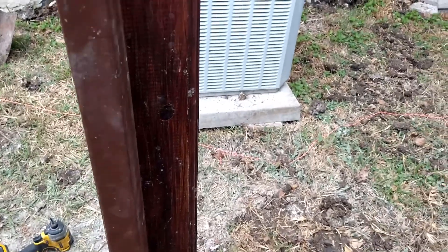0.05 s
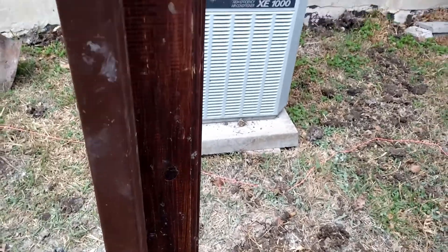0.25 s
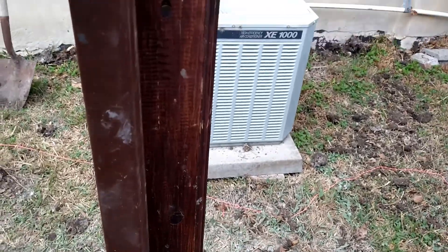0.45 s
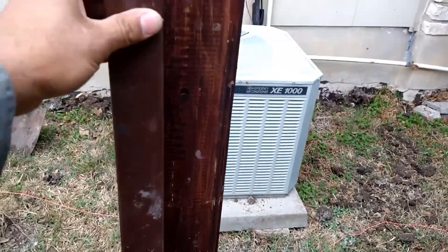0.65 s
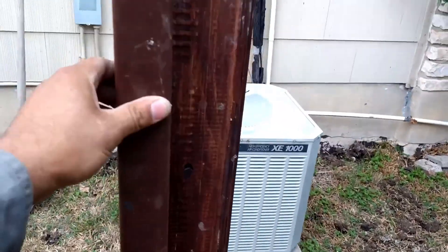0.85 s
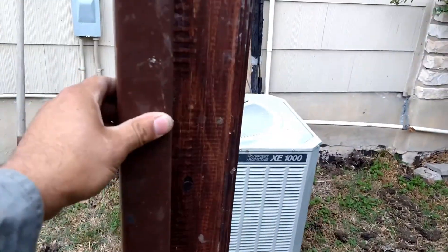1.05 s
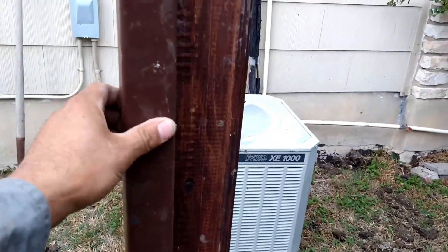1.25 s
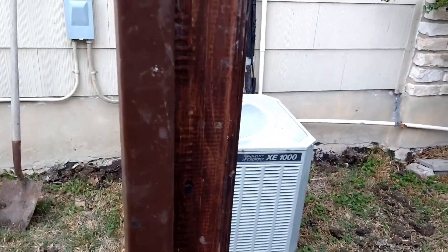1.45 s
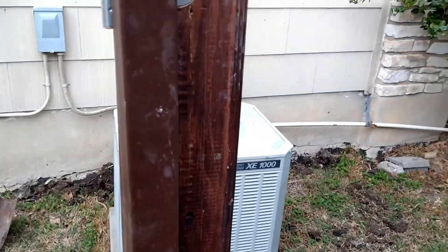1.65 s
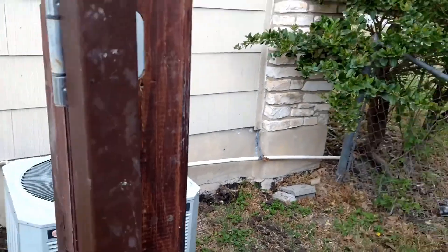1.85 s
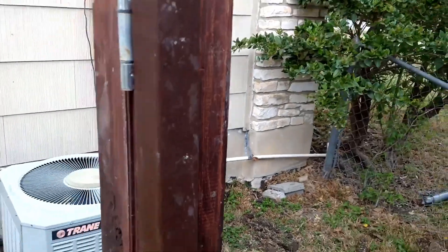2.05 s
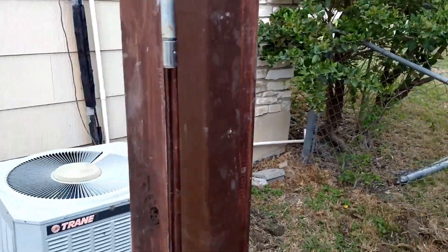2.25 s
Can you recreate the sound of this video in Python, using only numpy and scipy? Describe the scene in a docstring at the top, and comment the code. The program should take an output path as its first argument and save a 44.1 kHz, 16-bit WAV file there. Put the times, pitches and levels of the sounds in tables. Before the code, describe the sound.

Sharp rattle of a steel latch on a wooden yard gate, followed by small clinks.

```python
"""Rattling latch on a yard gate

A steel latch rattles close by, the wooden gate thuds and a loose metal piece clinks: each impact is
a noise burst plus decaying modes, reflected by the house wall and yard. Behind lie a low rumble, airy
hiss, a faint machine hum and whine, and late scuffs; wind buffets mainly the left microphone port."""
import sys
import numpy as np
from scipy import signal
from scipy.fft import rfft, irfft, next_fast_len
from scipy.io import wavfile
from scipy.ndimage import map_coordinates

SR = 44100
rng = np.random.default_rng(int(sys.argv[2]) if len(sys.argv) > 2 else 0)


def unload_wav(signal):
    """Save mono or channel-first audio to the path in sys.argv[1] as 16-bit WAV at rate SR, clipped to [-1, 1]."""
    wavfile.write(
        sys.argv[1],
        SR,
        np.round(np.clip(np.atleast_2d(signal).T, -1, 1) * 32767).astype(np.int16),
    )


N = 101429

# Noise spectra, shape only: frequency_hz, density_db
RUMBLE_SPECTRUM = [(15, -41), (25, -15.5), (91, -5.5), (173, -6.5), (253, 0), (331, -6.5), (359, -2),
                   (433, -10), (567, -9), (762, -11.5), (1350, -13.5), (2170, -16), (4500, -13),
                   (8130, -19.5), (15500, -41)]
HISS_SPECTRUM = [(2000, -27), (5000, 5), (8300, 8), (11000, -5), (15000, -3.5)]
WIND_SPECTRUM = [(25, -21), (60, -1), (115, 4), (180, -7.5), (350, -28), (8000, -77.5)]
CRACK_SPECTRUM = [(530, -57), (1980, -14), (2700, -17), (3600, -12.5), (5120, -6), (5770, -5), (7590, -4.5),
                  (9070, -5.5), (9980, -12), (11500, -11.5), (15500, -14.5)]
WOOD_SPECTRUM = [(30, -34.5), (130, -3), (230, 1), (520, -9.5), (1400, -15.5), (2600, -25.5), (5000, -71)]
SQUEAK_SPECTRUM = [(10300, -45), (11100, -3), (11450, 2), (12300, -41)]
SCUFF_SPECTRUM = [(100, -8.5), (350, -3), (800, -4), (1800, -14), (2750, -7.5), (3600, -22), (9000, -34.5)]
# Likeness of left and right: frequency_hz, coherence
AIR_COHERENCE = [(60, 0.92), (130, 0.88), (290, 1), (640, 0.404), (1400, 0.033), (8000, 0.036)]
METAL_COHERENCE = [(1000, 0.3), (2200, -0.56), (4400, 0.15), (8000, 0.0035), (13000, 0.38)]
# Stereo balance: frequency_hz, left_minus_right_db
AIR_BALANCE = [(100, -0.5), (600, 0.5), (1400, -3.5), (4400, -3), (15000, -5)]
METAL_BALANCE = [(1000, 1), (2400, -2.5), (4400, 1), (8000, -3.5), (15000, -5)]
# Slow changes of the background: time_s, gain_db
RUMBLE_GAIN = [(.8, -52), (2.3, -54)]
HISS_GAIN = [(0, -58.5), (.55, -56), (.9, -66.5), (2.3, -72.5)]
HUM_GAIN = [(1.7, -2), (2, -9.5)]  # the low hum eases as the microphone turns
WHINE_GAIN = [(0, 2), (.36, 12), (.5, 2.5), (1.0, 1.5), (1.7, 2), (1.95, -3.5), (2.3, -2)]
# Spectral lines of the machine: centre_hz, level_db, width_hz
MACHINE_LINES = [(221, -64, 36), (358, -71, 33), (1399, -69, 160), (2754, -68.5, 67), (4124, -68, 120)]
# Swells of noise: centre_s, half_width_s, level_db
WIND_PUFFS = [(.008, 0.036, -50.5), (1.018, 0.024, -42), (1.16, 0.12, -60.5), (2.002, 0.018, -36),
              (2.044, 0.012, -28.5), (2.088, 0.017, -46), (2.19, 0.029, -31), (2.243, 0.015, -30),
              (2.295, 0.036, -38.5)]
BAR_SQUEAKS = [(.2535, 0.0018, -12.5)]
SCUFFS = [(1.86, 0.045, -54.5), (2.07, 0.11, -55), (2.27, 0.1, -50.5)]
# Impacts of the loose piece: start_s, level_db, focus_hz, ring_gain_db, crack_t60_s
PIECE_IMPACTS = [(0.0285, -34.5, 8850, -31, 0.01), (.5724, -27.5, 8200, -4, 0.057),
                 (0.5734, -40.5, 5070, 18, .015), (.5845, -46, 6500, -4, .06),
                 (0.6111, -31, 9400, 7, 0.043), (0.614, -30, 9400, 4.5, 0.072),
                 (0.628, -35.5, 5600, -0.5, .08), (0.652, -41, 8900, -6, 0.093),
                 (0.701, -49, 5200, 5.5, 0.017), (.712, -41.5, 9600, -6, 0.073)]
# Contacts and rebounds of the latch: start_s, level_db, focus_hz
LATCH_IMPACTS = [(0.243, -26, 4520), (.2462, -14.5, 8700), (.2478, -17, 3670), (0.251, -12.5, 7000),
                 (0.2535, -18, 3630), (.2613, -13.5, 7700), (.2635, -19.5, 8700), (.2675, -23, 5170),
                 (.2725, -17.5, 7000), (.2777, -14, 7800), (0.2781, -27.5, 12500), (.2823, -20, 7300),
                 (.2862, -15, 8260), (.2918, -18.5, 6500), (.2957, -20, 7800), (.2995, -30, 7000),
                 (.3062, -17.5, 9150), (0.3106, -18, 5870), (.317, -21, 7360), (.3215, -26, 12000),
                 (.328, -26, 12500), (.353, -49, 6570), (0.4145, -33, 7200), (.441, -38, 6700),
                 (0.4492, -28.5, 6960), (0.471, -34.5, 7000)]
# Knocks of the gate: start_s, level_db, puff_t60_s, focus_hz
GATE_IMPACTS = [(0.246, -40, 0.13, 131), (.2925, -30.5, 0.074, 223), (.309, -30.5, 0.06, 660),
                (.324, -31.5, 0.038, 240), (.338, -36, 0.13, 300)]
# Normal modes of the struck bodies: pitch_hz, level_db, t60_s
PIECE_MODES = [(5120, -4.5, 0.039), (5250, 0, 0.037), (6120, -12, .04), (7400, -3, .025),
               (8916, -2.5, 0.084), (9500, -8.5, 0.024), (11240, -8.5, 0.15)]
LATCH_MODES = [(3660, -5.5, 0.0694), (5260, -0.5, 0.086), (6320, -4.5, 0.15), (6650, -1, 0.17),
               (6820, -7.5, .09), (7120, -3, .09), (7170, -8, .16), (7770, -0.5, .08), (7915, 0, 0.07),
               (8400, -2.5, 0.068), (8866, 3, 0.079), (11290, 4, .16), (12545, -1, 0.14)]
BOARD_MODES = [(140.7, -3, 0.24), (178.3, -5.5, .09), (239.1, -2, 0.22), (355.7, -5, .16),
               (516, -6.5, 0.09), (676, -3, 0.043), (983, -3.5, 0.0619)]
# Reverberation time of the yard: frequency_hz, t60_s
YARD_DECAY = [(200, 0.16), (3000, 0.16), (8000, 0.33), (15000, 0.18)]

METAL_ATTACK_S, PIECE_ATTACK_S, WOOD_ATTACK_S = 0.00018, 0.0011, 0.00086
STRESS_OCTAVES, STRESS_DB = 0.35, 4.5  # width and depth of the band a metal contact favours


def amp(db):
    """Amplitude ratio of a level in decibels."""
    return 10 ** (np.asarray(db) / 20)


def unit(x):
    """Normalisation to rms 1."""
    return x / np.sqrt(np.mean(x ** 2) + 1e-20)


def along(points, hz):
    """Interpolation on a logarithmic frequency axis."""
    knots_hz, values = np.transpose(points)
    return np.interp(np.log(hz + 1), np.log(knots_hz + 1), values)


def curve(rows):
    """Linear interpolation in time, one value per sample."""
    return np.interp(np.arange(N) / SR, *np.transpose(rows))


def filtered(x, response):
    """Linear filtering: the spectrum times a frequency response."""
    size = next_fast_len(x.shape[-1] + 8192)
    return irfft(rfft(x, size) * response(np.fft.rfftfreq(size, 1 / SR)), size)[..., :x.shape[-1]]


def noise(spectrum, coherence, size):
    """Partially coherent stereo noise of rms 1, mixed from independent mid and side signals."""
    def response(hz):
        angle = np.arccos(np.clip(along(coherence, hz), -1, 1)) / 2
        return amp(along(spectrum, hz)) * [np.cos(angle), np.sin(angle)]
    mid, side = filtered(rng.standard_normal((2, size)), response)
    return unit(np.array([mid + side, mid - side]))


def panned(x, balance):
    """Frequency-dependent level difference between the channels."""
    return filtered(x, lambda hz: amp(along(balance, hz) * np.array([[.5], [-.5]])))


def fade(t, t60):
    """Exponential decay, 60 dB in t60 seconds."""
    return np.exp(-np.log(1000) * t / t60)


def rise(t, attack_s):
    """First-order build-up towards 1."""
    return 1 - np.exp(-t / attack_s)


def add(track, start_s, sound):
    """Superposition of a sound on a track."""
    part = track[:, max(0, round(start_s * SR)):][:, :sound.shape[1]]
    part += sound[:, :part.shape[1]]


def burst(carrier, envelope):
    """Amplitude modulation, scaled so that the envelope alone sets the energy."""
    return unit(carrier * envelope) * np.sqrt(np.mean(envelope ** 2))


def swells(rows, spectrum, coherence):
    """Noise under Gaussian envelopes."""
    t = np.arange(N) / SR
    return sum(amp(db) * burst(noise(spectrum, coherence, N), np.exp(-((t - centre_s) / width_s) ** 2))
               for centre_s, width_s, db in rows)


def stress(hz, focus_hz, octaves, depth_db):
    """Selective excitation by a contact point: 0 dB at focus_hz, depth_db lower far from it."""
    return depth_db * (np.exp(-(np.log2((hz + 1) / focus_hz) / octaves) ** 2) - 1)


def ring(modes, t, focus_hz, octaves, depth_db, scatter_db, detune=0.0022):
    """Free vibration as a sum of damped modes; shifting contact detunes each from blow to blow."""
    out = 0
    for hz, db, t60 in modes:
        level_db = db + stress(hz, focus_hz, octaves, depth_db) + rng.normal(0, scatter_db, (2, 1))
        pitch_hz = hz * (1 + detune * rng.uniform(-1.73, 1))
        phase = rng.uniform(0, 2 * np.pi) + rng.normal(0, 0.77, (2, 1))  # differs at the two ports
        out += amp(level_db) * fade(t, t60) * np.sin(2 * np.pi * pitch_hz * t + phase)
    return out


def outdoor_air():
    """Broadband noise: a low rumble and an airy hiss, each slowly changing in level."""
    rumble = amp(curve(RUMBLE_GAIN)) * noise(RUMBLE_SPECTRUM, AIR_COHERENCE, N)
    hiss = amp(curve(HISS_GAIN)) * noise(HISS_SPECTRUM, AIR_COHERENCE, N)
    return rumble + hiss


def machine_hum():
    """Narrowband noise: each line of the machine has a finite width and so wavers in amplitude."""
    out = np.zeros((2, N))
    for centre_hz, db, width_hz in MACHINE_LINES:
        white = noise([(centre_hz, 0)], AIR_COHERENCE, N)
        line = unit(filtered(white, lambda hz: 1 / (1 + (2 * (hz - centre_hz) / width_hz) ** 2)))
        out += amp(db + curve(WHINE_GAIN if centre_hz > 1000 else HUM_GAIN)) * line
    return out


def machine_whine(pitch_hz=1366, wander_hz=2.67, base_db=-67):
    """Slow random frequency modulation of a thin tone, with the channels in quadrature."""
    drift = unit(filtered(rng.standard_normal(N), lambda hz: np.exp(-(hz / 10) ** 2)))
    phase = 2 * np.pi * np.cumsum(pitch_hz + wander_hz * drift) / SR
    return amp(base_db + curve(WHINE_GAIN)) * np.sqrt(2) * np.array([np.sin(phase), np.cos(phase)])


def wind(right_port_db=-18.5):
    """Turbulence at the microphone ports gives short swells of low-frequency pressure."""
    return swells(WIND_PUFFS, WIND_SPECTRUM, coherence=[(100, 0.53)]) * amp([[0], [right_port_db]])


def crack(t, t60, focus_hz, ripple_db=4.5, spacing_hz=381):
    """A brief metal contact excites a broad spectrum; each contact point stresses other bands."""
    knots = rng.standard_normal(256)
    def colour(hz):
        uneven_db = ripple_db * map_coordinates(knots, [hz / spacing_hz])
        return amp(uneven_db + stress(hz, focus_hz, STRESS_OCTAVES, STRESS_DB))
    return burst(filtered(noise(CRACK_SPECTRUM, METAL_COHERENCE, len(t)), colour), fade(t, t60))


def piece_clinks():
    """Impact excitation of the loose piece: a crack, then modes that take a moment to build."""
    out, t = np.zeros((2, N)), np.arange(SR // 4) / SR
    for start_s, db, focus_hz, ring_db, t60 in PIECE_IMPACTS:
        modes = ring(PIECE_MODES, t, focus_hz, octaves=0.74, depth_db=22, scatter_db=3)
        snap = rise(t, METAL_ATTACK_S) * crack(t, t60, focus_hz)
        add(out, start_s, amp(db) * (snap + amp(ring_db) * rise(t, PIECE_ATTACK_S) * modes))
    return out


def yard_reverberation(direct, gain_db=-10.5, delay_s=0.012):
    """Diffuse reflection from wall and fence: convolution with noise that decays band by band."""
    hz, t, bands = signal.stft(rng.standard_normal((2, SR // 2)), SR, nperseg=256)
    tail = signal.istft(bands * fade(t, along(YARD_DECAY, hz)[:, None]), SR, nperseg=256)[1]
    out = np.zeros((2, N))
    add(out, delay_s, signal.fftconvolve(direct, tail / np.linalg.norm(tail[0]), axes=1))
    return amp(gain_db) * out


def latch_rattle(crack_db=-1, ring_db=-17.5):
    """Repeated impact: each rebound gives a bright crack and excites the modes of the steel latch."""
    out, t = np.zeros((2, N)), np.arange(SR // 4) / SR
    for start_s, db, focus_hz in LATCH_IMPACTS:
        modes = amp(ring_db) * ring(LATCH_MODES, t, focus_hz, STRESS_OCTAVES, STRESS_DB, scatter_db=4)
        snap = amp(crack_db) * crack(t, t60=0.03, focus_hz=focus_hz)
        add(out, start_s, amp(db) * rise(t, METAL_ATTACK_S) * (snap + modes))
    return out


def gate_thuds(puff_db=-3, boards_db=-0.5):
    """Damped vibration of wood: each knock is a dull puff plus the low modes of the boards."""
    out, t = np.zeros((2, N)), np.arange(SR // 2) / SR
    for start_s, db, t60, focus_hz in GATE_IMPACTS:
        puff = burst(noise(WOOD_SPECTRUM, coherence=[(300, 0.94), (2000, .5)], size=len(t)), fade(t, t60))
        boards = ring(BOARD_MODES, t, focus_hz, octaves=0.99, depth_db=10, scatter_db=2)[0]  # mono
        thud = amp(puff_db) * puff + amp(boards_db) * boards
        add(out, start_s, amp(db) * rise(t, WOOD_ATTACK_S) * thud)
    return out


def bar_squeak():
    """Sliding friction of the latch bar gives one brief, high band of noise."""
    return swells(BAR_SQUEAKS, SQUEAK_SPECTRUM, METAL_COHERENCE)


def scuffs():
    """Faint swells of broadband noise, heard as scuffs near the end."""
    return swells(SCUFFS, SCUFF_SPECTRUM, AIR_COHERENCE)


def scene():
    """Superposition of all sources; only the metal and the gate reverberate."""
    metal = panned(latch_rattle() + piece_clinks() + bar_squeak(), METAL_BALANCE)
    direct = metal + gate_thuds()
    reflected = yard_reverberation(direct)
    background = panned(outdoor_air() + machine_hum(), AIR_BALANCE) + machine_whine()
    return direct + reflected + background + wind() + scuffs()


def record(dry):
    """Band limiting by a steep low-pass filter."""
    cutoff_hz = 15650
    return filtered(dry, lambda hz: 1 / np.sqrt(1 + (hz / cutoff_hz) ** 160))


dry = scene()
out = record(dry)
unload_wav(out)
```